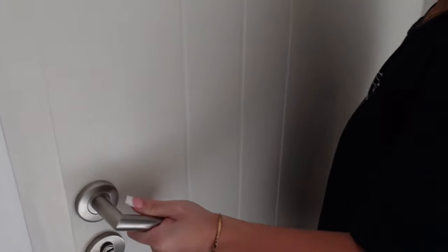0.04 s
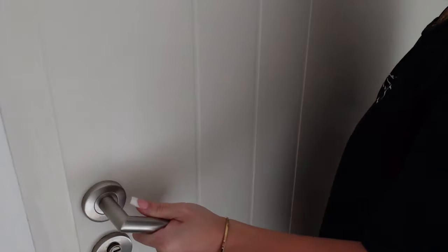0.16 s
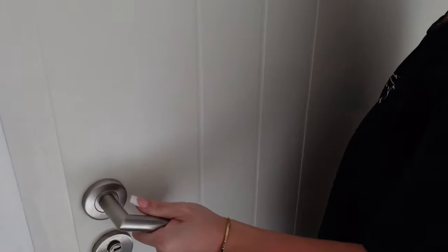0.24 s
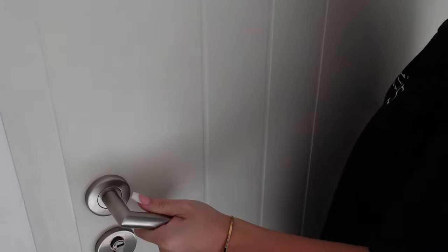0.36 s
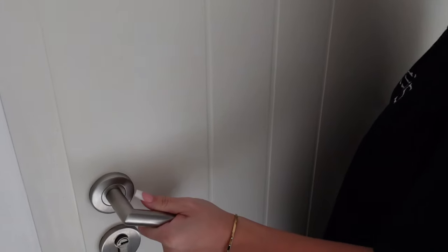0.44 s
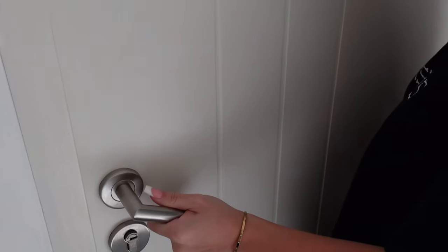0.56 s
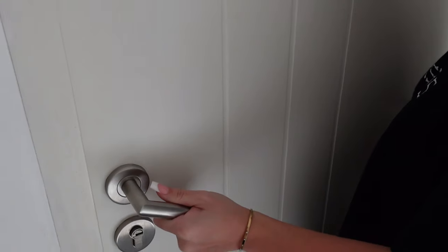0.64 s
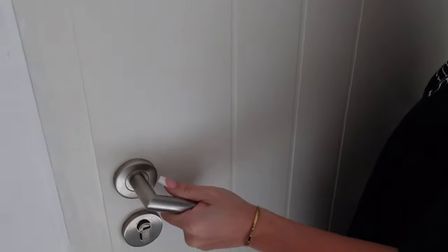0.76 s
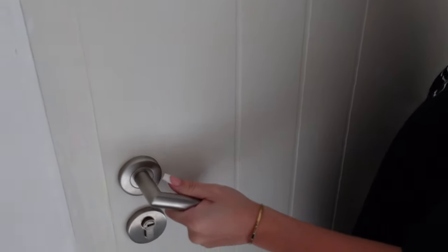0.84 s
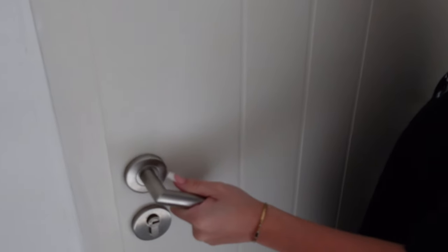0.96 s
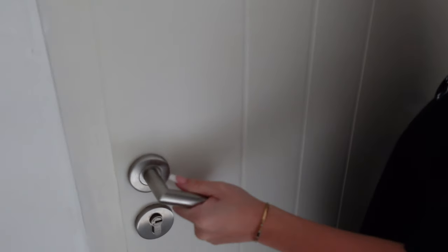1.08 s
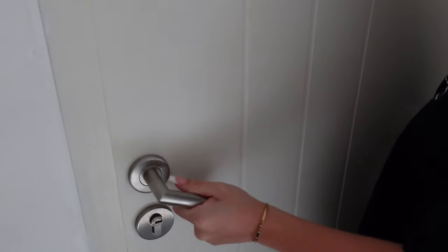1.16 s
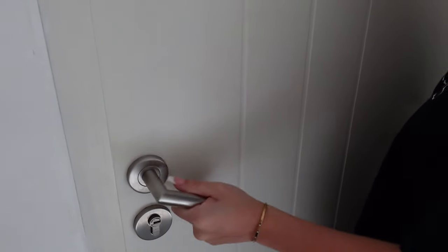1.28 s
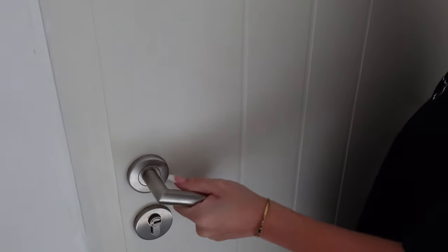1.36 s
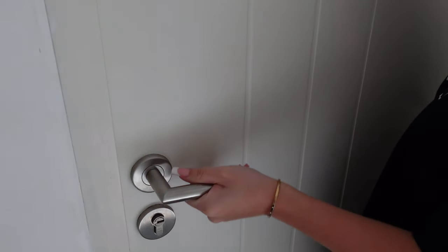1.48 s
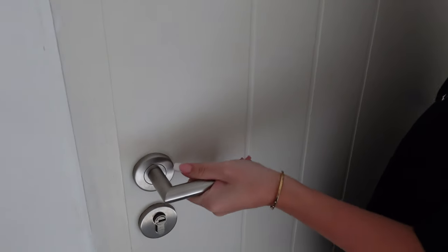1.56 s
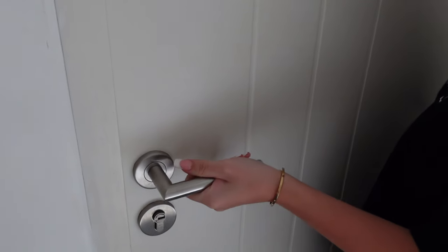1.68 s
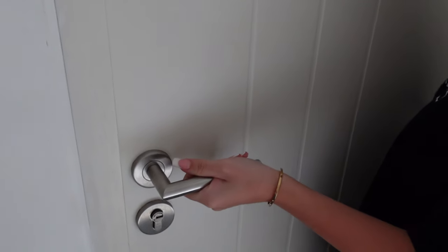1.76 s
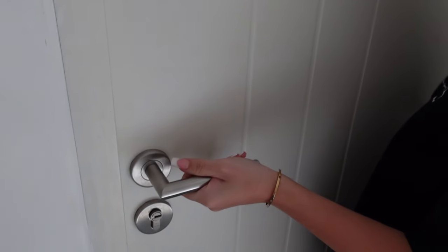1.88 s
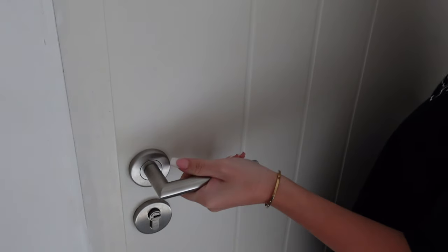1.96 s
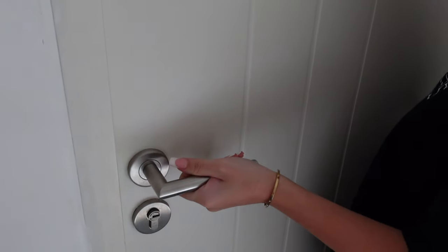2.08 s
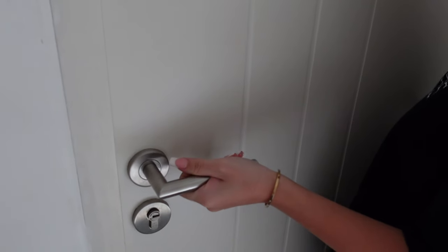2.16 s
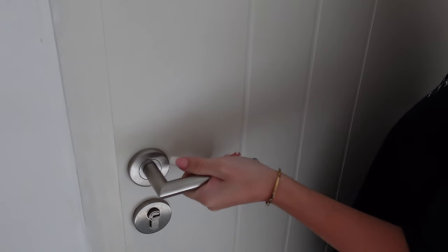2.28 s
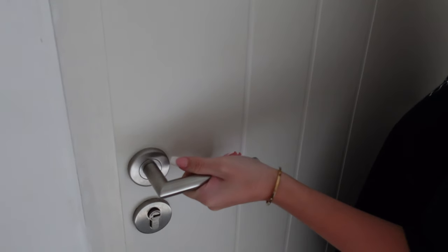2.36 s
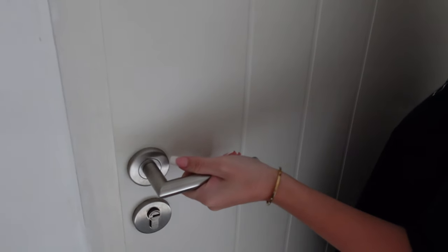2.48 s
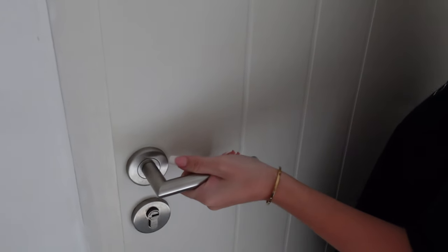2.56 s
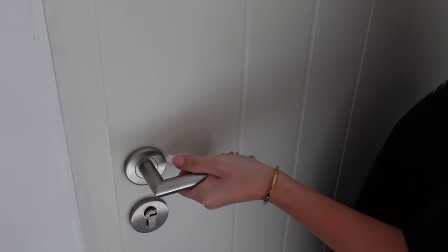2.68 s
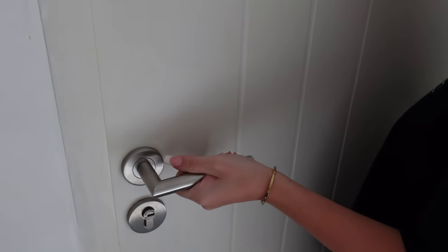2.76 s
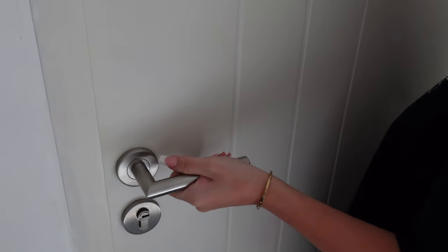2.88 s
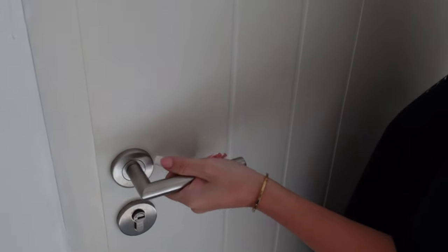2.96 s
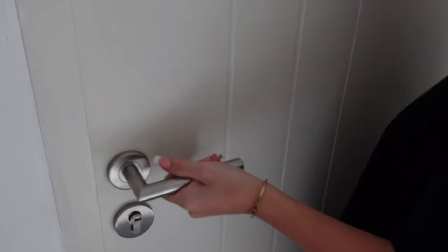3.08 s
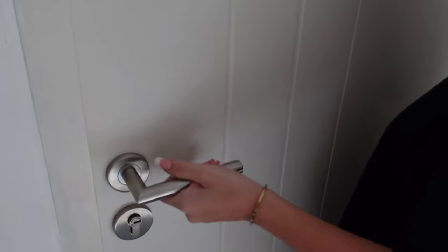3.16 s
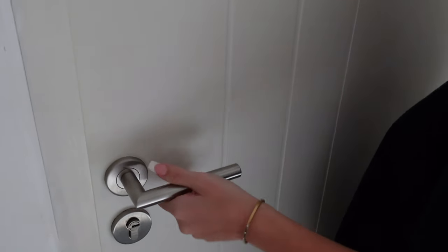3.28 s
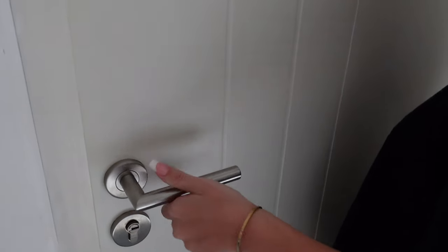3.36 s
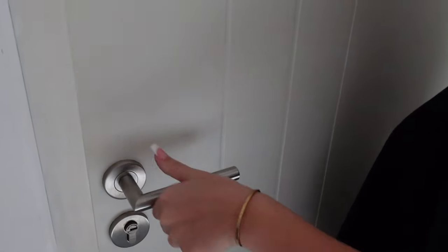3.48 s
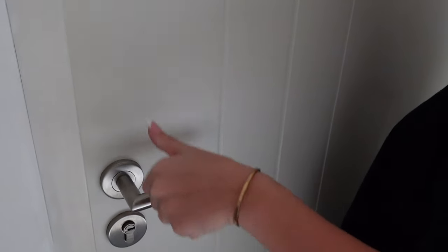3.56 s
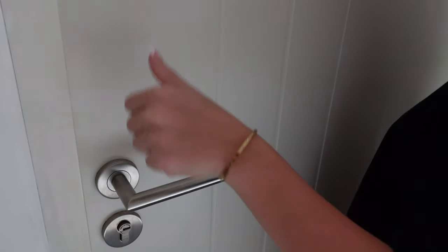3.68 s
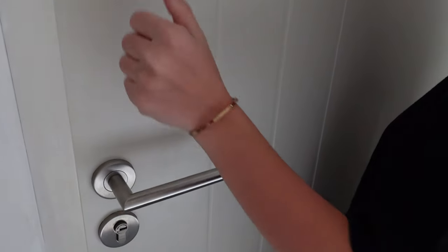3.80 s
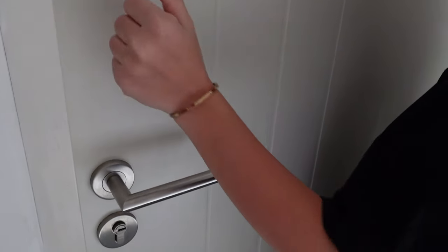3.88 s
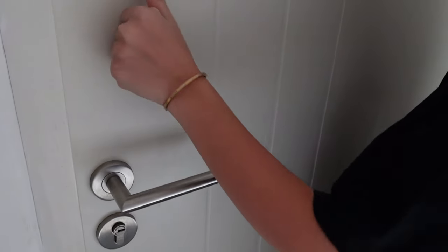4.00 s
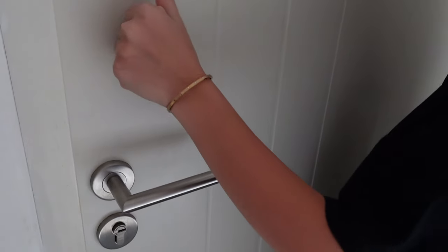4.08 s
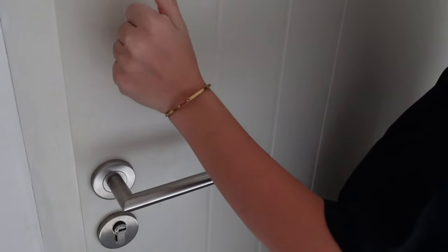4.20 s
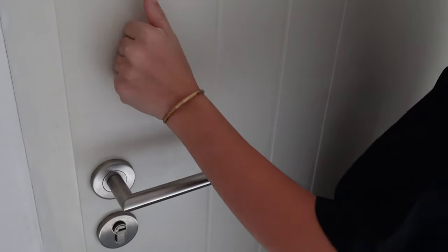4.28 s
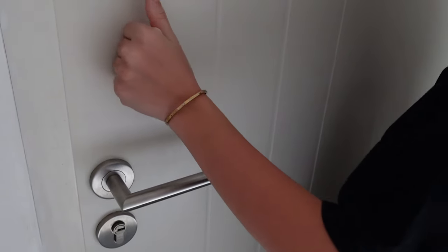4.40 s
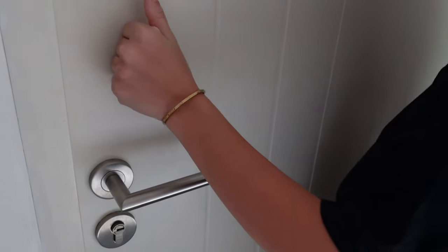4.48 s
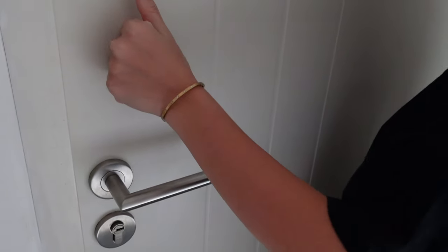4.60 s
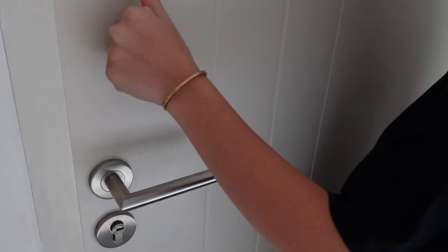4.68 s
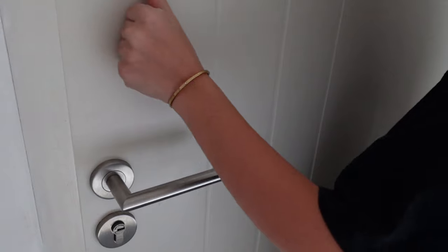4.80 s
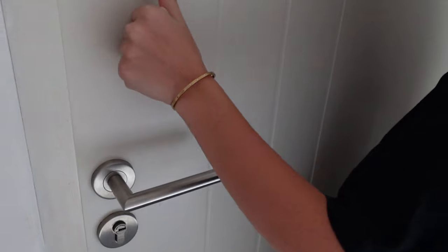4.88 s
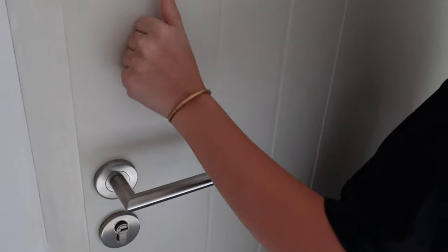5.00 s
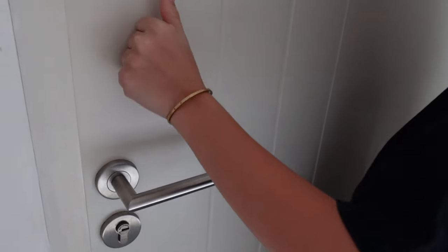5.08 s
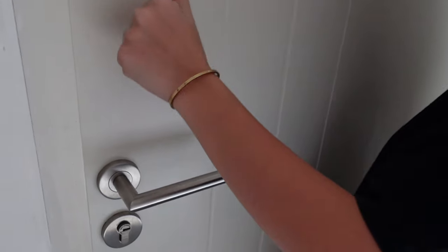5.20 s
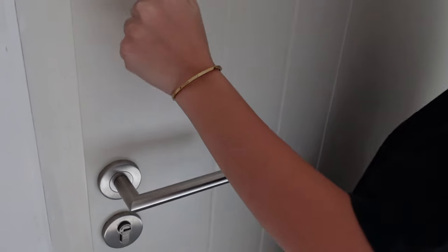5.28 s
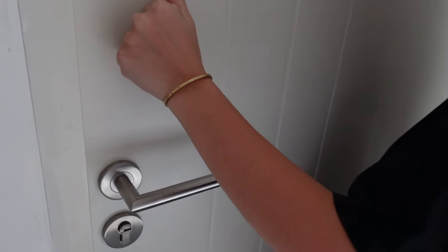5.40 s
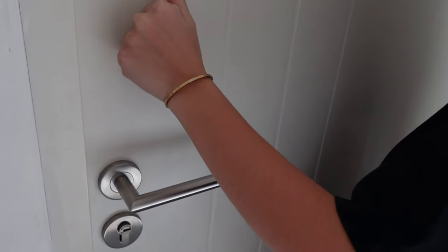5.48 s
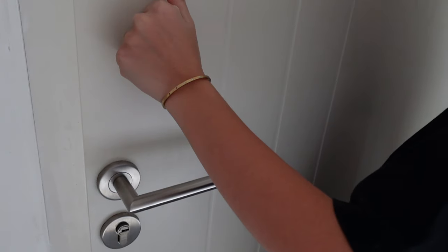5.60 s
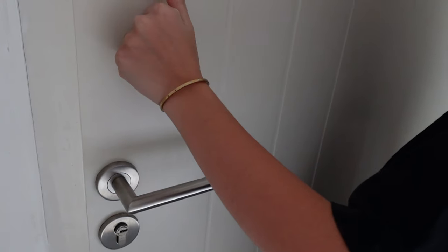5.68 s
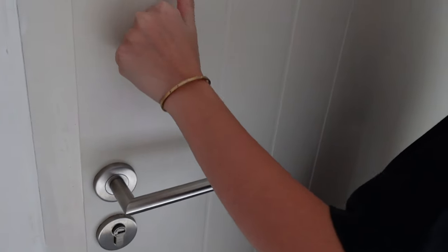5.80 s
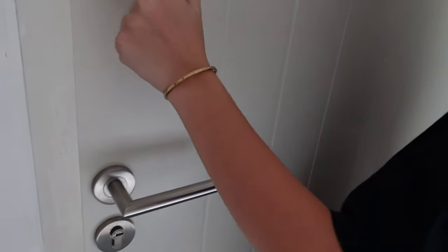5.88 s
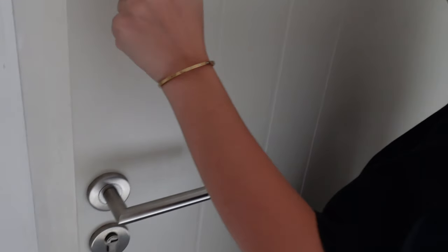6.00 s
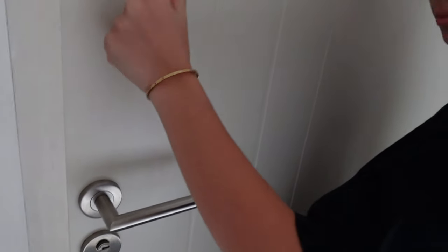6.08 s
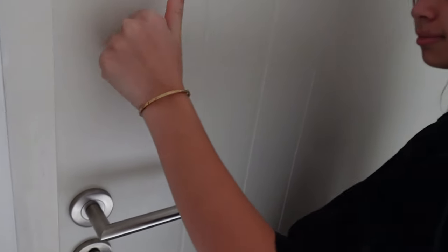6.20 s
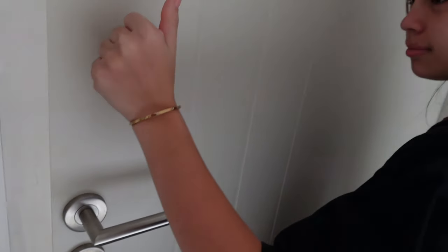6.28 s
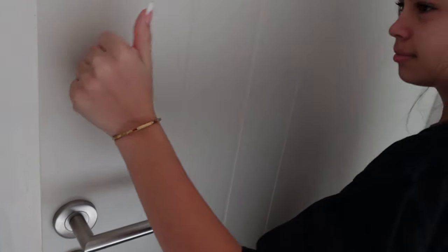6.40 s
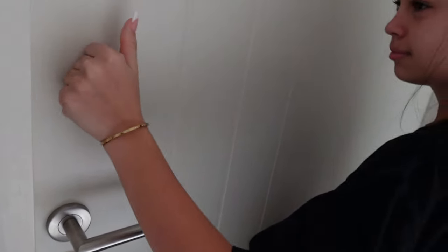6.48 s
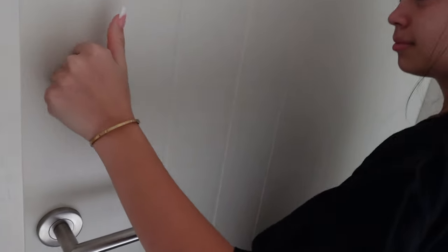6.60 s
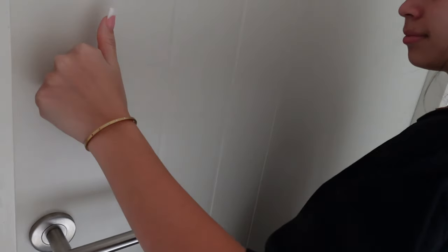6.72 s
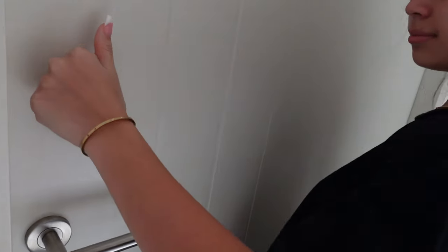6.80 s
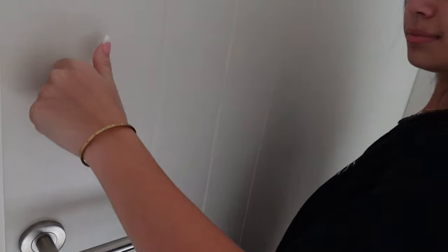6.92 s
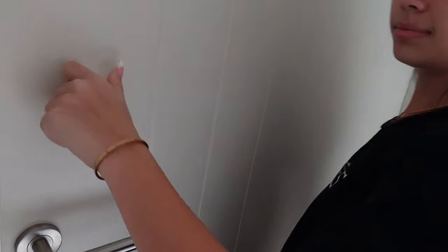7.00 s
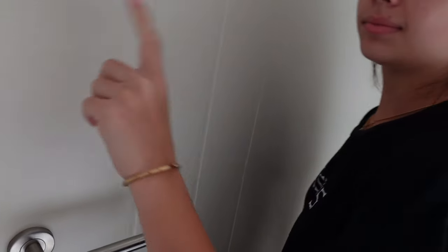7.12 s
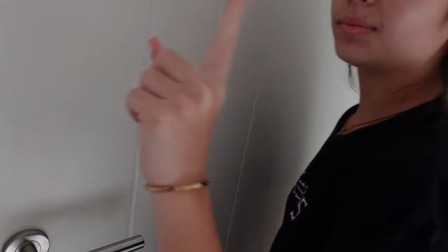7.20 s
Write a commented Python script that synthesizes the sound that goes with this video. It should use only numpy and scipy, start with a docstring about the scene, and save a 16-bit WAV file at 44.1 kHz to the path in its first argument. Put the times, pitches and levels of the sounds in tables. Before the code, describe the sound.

Over faint ventilation, a door booms closed, the handle clacks and the latch rings, then seven spaced knuckle knocks echo before a sleeve rustles.

```python
"""Under faint ventilation air and wavering fan lines, a wooden door bumps shut in a bare hallway, the bump
already under way at the start. A hand rubs, the handle is let up, the steel latch snaps in and rings its case,
and the leaf settles with soft thuds. Knuckles then knock seven times, each on its own spot, driving the panel
modes; a rub passes among the knocks. At the end a sleeve rustles as the arm drops, with one faint click.
Door and knocks excite the hallway: a wall reflection, scatter, standing waves and a diffuse tail."""
import sys
import numpy as np
from scipy import signal
from scipy.fft import rfft, irfft
from scipy.io import wavfile
from scipy.ndimage import uniform_filter1d, minimum_filter1d

SR = 44100
rng = np.random.default_rng(int(sys.argv[2]) if len(sys.argv) > 2 else 0)


def to_wav(sig):
    """Store sig (one row per channel, or 1-D mono) as 16-bit WAV at the path in sys.argv[1].

    Samples outside -1..1 are clipped; the rate is SR.
    """
    pcm = np.clip(np.atleast_2d(sig), -1, 1) * 32767
    pcm = np.round(pcm).astype(np.int16)
    wavfile.write(sys.argv[1], SR, pcm.T)  # frames by channels


N = 319725  # scene length, samples
TAIL = 2 ** 16  # length of one struck sound with its echo, samples
T = np.arange(TAIL) / SR  # s

# Diffuse hallway echo. Each row: frequency in Hz, relative level in dB, t60 in s, side relative to mid in dB.
HALL_ECHO = [(69.5, 2, 1.6, -32), (160, 2.5, 1.45, -14.5), (340, 0, 1.22, -11.5), (657, 3.5, 1.1, -12.5),
             (970, 5, 1.146, -11), (2240, 2, 1.05, -11), (4600, 4.5, 0.823, -7), (8900, 1, 0.59, -10.5),
             (15000, -1, 0.51, -46)]


def amp(db):
    """Decibels to amplitude factor."""
    return 10 ** (np.asarray(db) / 20)


def unit(x):
    """Scale to unit energy."""
    return x / np.sqrt(np.sum(x ** 2))


def curve(points, size, axis=1):
    """One table column interpolated over log frequency at the bins of a transform."""
    rows = np.array(points, float)
    bins_hz = np.fft.rfftfreq(size, 1 / SR) + 1
    return np.interp(np.log(bins_hz), np.log(rows[:, 0]), rows[:, axis])


def soften(x, hz, order=2, kind="low"):
    """Butterworth low-pass, as a softer contact loses treble; kind="high" removes bass instead."""
    cutoff_hz = min(hz, SR / 2 - 2000)
    return signal.sosfilt(signal.butter(order, cutoff_hz, kind, fs=SR, output="sos"), x)


def ring(hz, t60_s):
    """Struck mode: exponentially decaying cosine of unit energy."""
    return unit(np.cos(2 * np.pi * hz * T) * np.exp(-np.log(1000) * T / t60_s))


def click(points):
    """Minimum-phase click of the given colour, unit energy, by folding the cepstrum."""
    cepstrum = irfft(np.log(amp(curve(points, TAIL))))
    cepstrum[1:TAIL // 2] *= 2
    cepstrum[TAIL // 2 + 1:] = 0
    return unit(irfft(np.exp(rfft(cepstrum))))


def add(out, start_s, sound):
    """Mix a sound in at start_s, cropped to the scene."""
    start = int(round(start_s * SR))
    a, b = max(start, 0), min(start + sound.shape[-1], N)
    out[:, a:b] += sound[..., a - start:b - start]


def diffuse(size):
    """Spectrum of stereo noise from all around; the bass is nearly alike in both ears."""
    mid, side = rfft(rng.standard_normal((2, size)))
    side = side * amp(curve(HALL_ECHO, size, axis=3))
    return mid + np.array([[1], [-1]]) * side


def ventilation(waver_hz=3, waver_db=-5, hum_db=0, air_db=-51.5, hiss_db=-76):
    """Steady coloured air noise, a faint even hiss and narrow fan lines modulated by slow noise."""
    # Each row: frequency in Hz, relative level in dB.
    air_colour = [(25, -42.5), (45, -26), (80, -12.5), (125, -3), (260, -4.5), (430, -12.5), (700, -12.5),
                  (1100, -13.5), (1500, -19), (2200, -24), (4000, -30), (8000, -37), (15500, -37.5)]
    # Each row: frequency in Hz, RMS level in dB.
    fan_lines = [(199, -77), (258, -74), (673, -70), (1103, -61), (1443, -72), (1523, -72.5), (2122, -74)]
    air = irfft(diffuse(N) * amp(curve(air_colour, N)), N)
    out = amp(air_db) * air / air.std() + amp(hiss_db) * rng.standard_normal(N)
    for hz, db in fan_lines:
        waver = rng.standard_normal(N) + 1j * rng.standard_normal(N)
        waver = soften(waver, waver_hz, order=1)
        carrier = np.exp(2j * np.pi * hz * np.arange(N) / SR)
        line = np.real((1 + amp(waver_db) * waver / waver.std()) * carrier)
        out = out + amp(db + hum_db) * line / line.std()
    return out


def hallway(x, echo_db, standing_db, wall_s=.0058, wall_db=-5, near_db=0, near_s=0.0048,
            build_s=0.0067, hold_s=0.016):
    """Direct sound, the facing wall, scatter from the door frame, standing waves and the diffuse tail."""
    # Each row: frequency in Hz, relative level in dB, t60 in s.
    standing_waves = [(71.5, -10, 1.3), (88, -19, 0.91), (118.2, -11.5, 1.9), (137.9, -4, 0.83),
                      (181.6, -2, 0.926), (190.8, -10.5, 1.3), (200.7, -0.5, 1.04), (229.8, 0, 0.61),
                      (263.3, 5.5, 0.71), (272.3, -7, 1.5), (303, -4, 0.56), (317.4, 1, 0.3),
                      (416.4, -4, 0.93), (468.6, -8, 0.44), (608.6, 1, 0.28), (632.8, -1, 1.16),
                      (715, -4, 1.1), (802, 1.5, 0.65)]
    noise = diffuse(TAIL)
    age_s = np.maximum(T - hold_s, 0)  # sound runs the corridor's length before it starts to fade
    build = 1 - np.exp(-T / build_s)
    response = np.zeros((2, TAIL))
    for (_, db, t60_s, _), share in zip(HALL_ECHO, np.eye(len(HALL_ECHO))):
        weights = [(row[0], w) for row, w in zip(HALL_ECHO, share)]  # overlapping triangular bands
        band = irfft(noise * curve(weights, TAIL))
        envelope = unit(np.exp(-np.log(1000) * age_s / t60_s) * build)
        response += amp(db + echo_db) * band * envelope
    scatter = soften(irfft(diffuse(TAIL)), 630, kind="high")
    response += amp(near_db) * scatter * unit(T * np.exp(-2 * T / near_s))
    standing = sum(amp(db) * ring(hz, t60_s) for hz, db, t60_s in standing_waves)
    response += amp(standing_db) * standing * build
    response[:, 0] += 1  # direct
    response[:, int(wall_s * SR)] += amp(wall_db)
    return signal.fftconvolve(response, x[None], axes=1)[:, :TAIL]


def shut(boom_hz=71, boom_t60_s=1.0, boom_db=-7, held_s=.26, grip_s=0.041, level_db=7.5):
    """The closing leaf hits the frame and booms on its hinges until the hand stills it."""
    # Each row: frequency in Hz, relative level in dB.
    bump_colour = [(24, -49), (40, -18), (70, -9.5), (98, -7.5), (188, -2.5), (218, -14), (252, -7),
                   (429, -13), (508, -8.5), (1080, -6.5), (2760, -13.5), (3520, -25.5), (6600, -27.5),
                   (13000, -45)]
    grip = np.clip((held_s - T) / grip_s, 0, 1)  # silent by held_s
    boom = ring(boom_hz, boom_t60_s) * grip
    bump = hallway(soften(click(bump_colour), 83, kind="high"), echo_db=-1.0, standing_db=-21)
    return amp(level_db) * (bump + amp(boom_db) * boom)


def rub(length_s, hz, width_hz, grain_db=3):
    """Hand or sleeve friction: band-passed noise, randomly uneven, that swells and fades."""
    size = int(length_s * SR)
    f = np.fft.rfftfreq(size, 1 / SR) + 1
    resonance = np.hypot(1, (f - hz * hz / f) / width_hz)
    hiss = irfft(diffuse(size) / resonance, size)
    grain = np.interp(np.arange(size), np.linspace(0, size, 60), rng.standard_normal(60))
    return hiss / hiss.std() * amp(grain_db * grain) * np.hanning(size)


def latch(bright_hz, ring_db=-4, chatter_db=0, chatter_s=0.0044, level_db=19):
    """The steel bolt chatters on its plate and rings the modes of the lock case."""
    # Each row: frequency in Hz, relative level in dB.
    snap_colour = [(120, -59), (270, -8), (470, -18.5), (800, 0.5), (1150, -2.5), (2400, -2), (3700, -12),
                   (5600, -11.5), (7400, -23), (15000, -25.5)]
    # Each row: frequency in Hz, relative level in dB, t60 in s.
    case_modes = [(1070, 1, 0.026), (1523, -2.5, 0.074), (1940, -12, 0.072), (2150, -5.5, 0.16),
                  (2370, -11, .1), (2824, -11, .07), (3380, -15.5, 0.09), (4000, -22, .05),
                  (4740, -22, .04), (5560, -25, 0.106)]
    snap = click(snap_colour)
    chatter = unit(rng.standard_normal(TAIL) * np.exp(-T / chatter_s))
    snap = snap + amp(chatter_db) * signal.fftconvolve(snap, chatter)[:TAIL]
    case = sum(amp(db) * ring(hz, t60_s) for hz, db, t60_s in case_modes)
    case = soften(case, 340, kind="high")
    struck = soften(snap + amp(ring_db) * case, bright_hz, order=1)
    return amp(level_db) * hallway(struck, echo_db=0.5, standing_db=-28.5, wall_db=-8)


def thud(hz, cycles=5, level_db=21):
    """A soft push of the frame flexes the leaf; it decays by 60 dB in a few cycles."""
    flex = soften(ring(hz, cycles / hz), hz * 4.1)
    flex = soften(flex, hz * 0.56, kind="high")
    return amp(level_db) * hallway(unit(flex), echo_db=2.5, standing_db=-20.0)


def knock(across, up, contact_hz, swell=0.3, level_db=16.5, tick_db=-48, tick_s=0.0011,
          tick_echo_db=-49, crack_db=-26, crack_hz=2750, crack_s=.0018):
    """Skin over bone ticks and drives each panel mode by its displacement at the struck spot."""
    # Panel modes, leaf boom to skin crack. Each row: frequency in Hz, bandwidth in Hz, relative level in dB.
    panel_modes = [(254, 89, -5), (525, 128, 4.5), (889.3, 193, 1), (1158, 235, 3.2), (1447, 507, 0),
                   (2420, 380, -9), (3610, 460, -22.5)]
    # Bending shape of each mode. Each row: half-waves across, half-waves up.
    mode_shapes = [(1, 2), (2, 3), (5, 1), (4, 2), (3, 4), (6, 5), (1, 8)]
    panel = 0
    for (hz, width_hz, db), (waves_across, waves_up) in zip(panel_modes, mode_shapes):
        # nothing on a nodal line
        drive = np.sin(np.pi * waves_across * across) * np.sin(np.pi * waves_up * up)
        fade = np.pi * width_hz  # decay rate, 1/s
        rise = (1 - np.exp(-T * fade / swell)) ** 2  # the bending wave needs time to fill the panel
        panel = panel + drive * amp(db) * unit(ring(hz, np.log(1000) / fade) * rise)
    wood = soften(panel, contact_hz, order=3)
    wood = soften(wood, 66, order=4, kind="high")  # the slowest flexing radiates little
    tick = unit(rng.standard_normal(TAIL) * np.exp(-T / tick_s))
    crack = soften(rng.standard_normal(TAIL) * np.exp(-T / crack_s), crack_hz, order=5)
    crack = unit(soften(crack, 1500, kind="high"))
    heard = hallway(wood + amp(tick_echo_db) * tick, echo_db=2.5, standing_db=-18.5)
    # crack and tick come straight from the struck spot
    return amp(level_db) * (heard + amp(crack_db) * crack + amp(tick_db) * tick)


def scene(shade=0.051, shade_hz=250):
    """Every sound of the door, a little to the right, over the ventilation."""
    # Hand and sleeve. Each row: start in s, length in s, relative level in dB, centre in Hz, width in Hz.
    rubs = [(1.1, 0.33, -63.5, 3580, 4480), (5.347, 0.39, -60.5, 9000, 9180),
            (6.957, 0.27, -62, 7900, 15100), (7.086, 0.201, -60, 3430, 4900)]
    # Latch and handle, then one faint click with the sleeve rustle.
    # Each row: start in s, relative level in dB, low-pass cutoff in Hz.
    clicks = [(1.154, -49, 8000), (1.3886, -24.5, 6030), (1.393, -28.5, 1980), (1.4065, -32, 8000),
              (1.4767, -16, 11000), (1.4836, -28.5, 5000), (1.4828, -49, 3500), (7.095, -46, 7000)]
    # Leaf settling. Each row: start in s, relative level in dB, flexing pitch in Hz.
    thuds = [(1.5, -24, 432), (1.585, -30.5, 147), (1.654, -33.5, 155), (1.852, -27, 292),
             (1.875, -28.5, 128)]
    # Each row: start in s, relative level in dB, spot across the panel 0-1, spot up it 0-1,
    # contact hardness as low-pass cutoff in Hz.
    knocks = [(4.013, -13, .198, .198, 2320), (4.2996, -7, 0.46, 0.4, 2440),
              (4.8292, -7.5, 0.16, 0.06, 2483), (5.0164, -6, 0.8, 0.61, 3200),
              (5.3777, -7, 0.45, 0.31, 2487), (6.1378, -11, 0.49, 0.39, 2920),
              (6.4814, -8.5, 0.26, .592, 4200)]
    door = np.zeros((2, N))
    add(door, -0.028, shut())
    for start_s, length_s, db, hz, width_hz in rubs:
        add(door, start_s, amp(db) * rub(length_s, hz, width_hz))
    for start_s, db, bright_hz in clicks:
        add(door, start_s, amp(db) * latch(bright_hz))
    for start_s, db, hz in thuds:
        add(door, start_s, amp(db) * thud(hz))
    for start_s, db, across, up, contact_hz in knocks:
        add(door, start_s, amp(db) * knock(across, up, contact_hz))
    short_waves = soften(door, shade_hz, order=1, kind="high")  # only these are shaded on the left
    return door + np.array([[-1], [1]]) * shade * short_waves + ventilation()


def record(dry, bass_hz=35, ceiling=0.64, top_hz=15650):
    """Drop the deepest bass, duck peaks over the ceiling for a few milliseconds, cut the top steeply."""
    sound = soften(dry, bass_hz, kind="high")
    gain = np.minimum(1, ceiling / (np.abs(sound).max(axis=0) + 1e-9))
    gain = minimum_filter1d(gain, size=201)
    gain = uniform_filter1d(uniform_filter1d(gain, size=101), size=101)
    top_cut = signal.ellip(8, .2, 70, top_hz, fs=SR, output="sos")
    return signal.sosfilt(top_cut, sound * gain)


dry = scene()
out = record(dry)
to_wav(out)
```